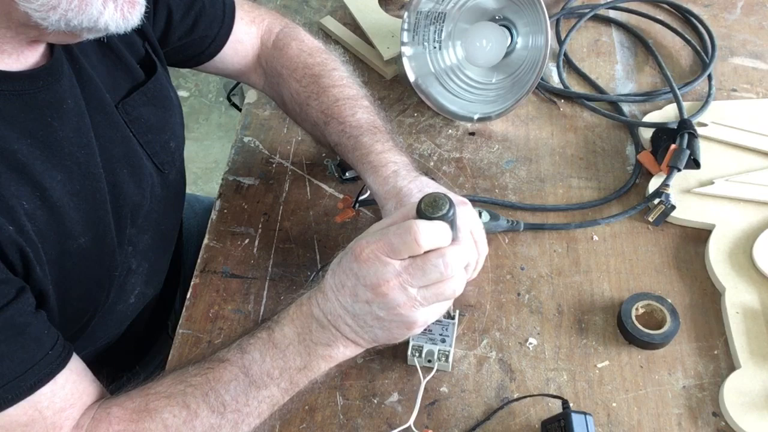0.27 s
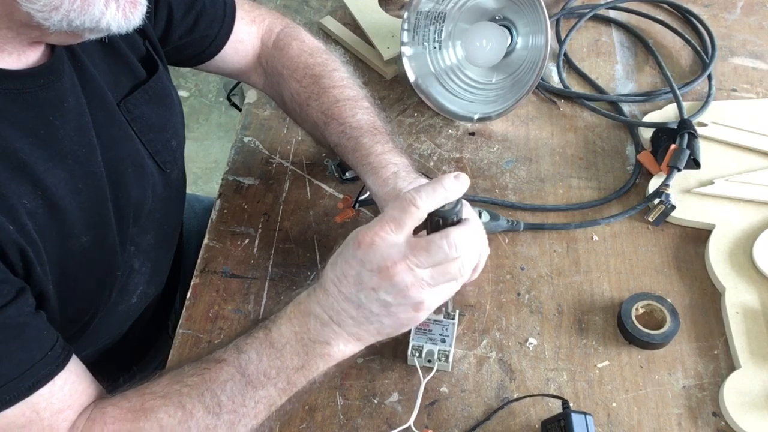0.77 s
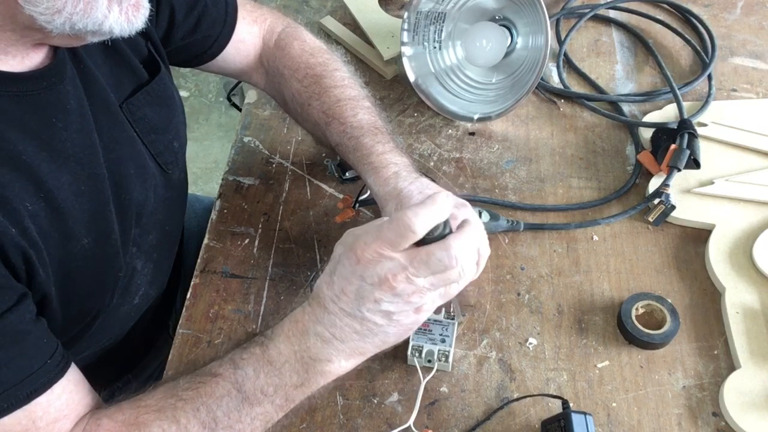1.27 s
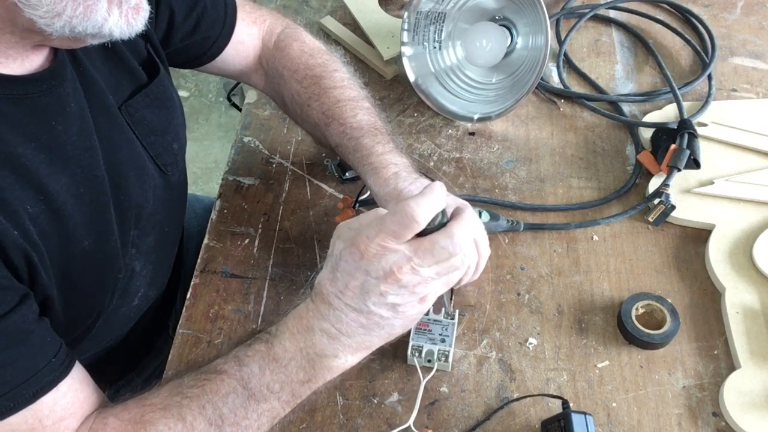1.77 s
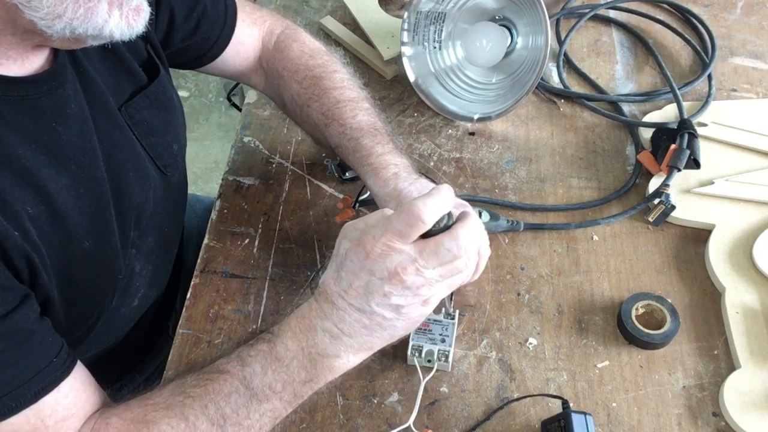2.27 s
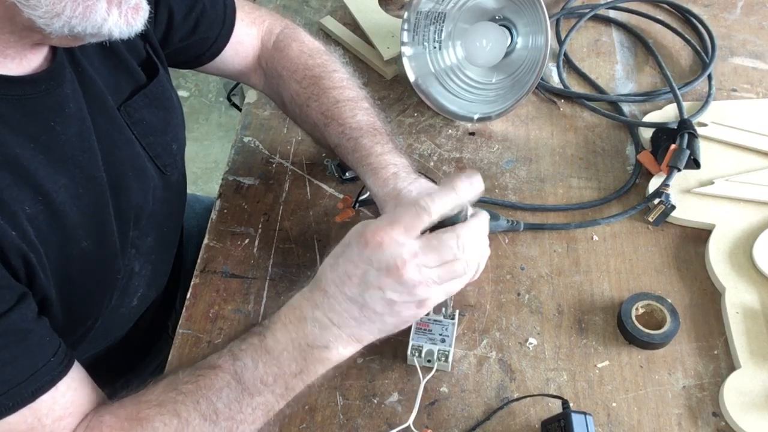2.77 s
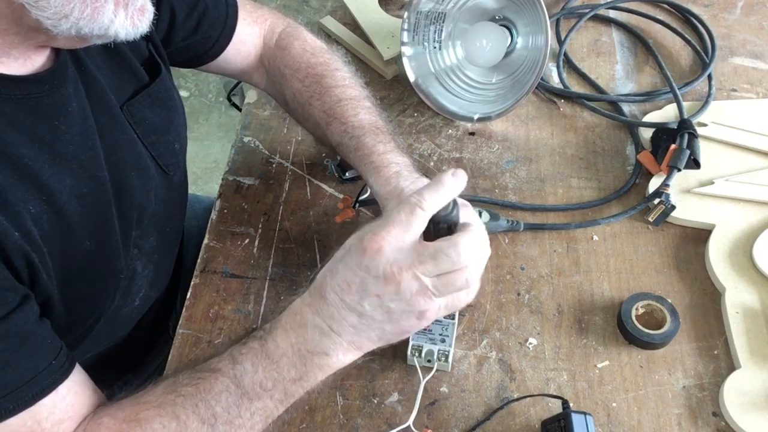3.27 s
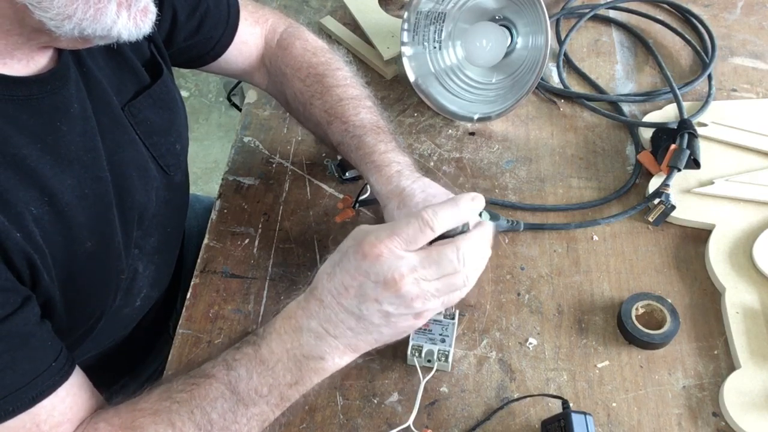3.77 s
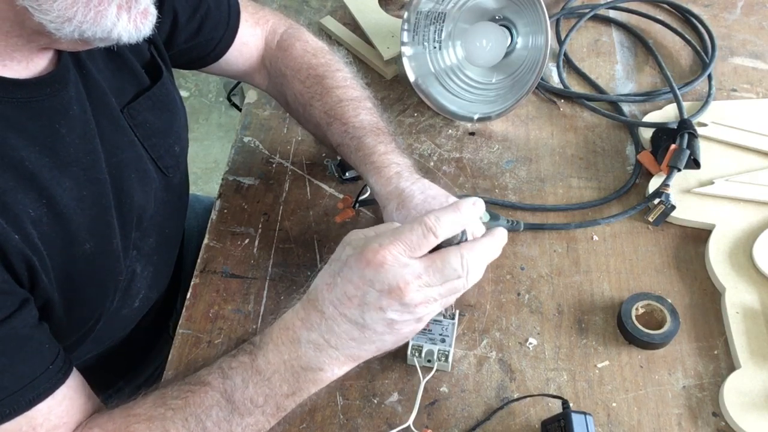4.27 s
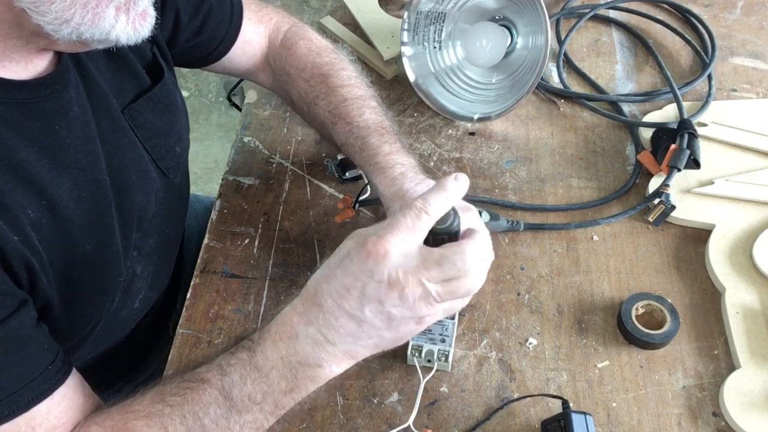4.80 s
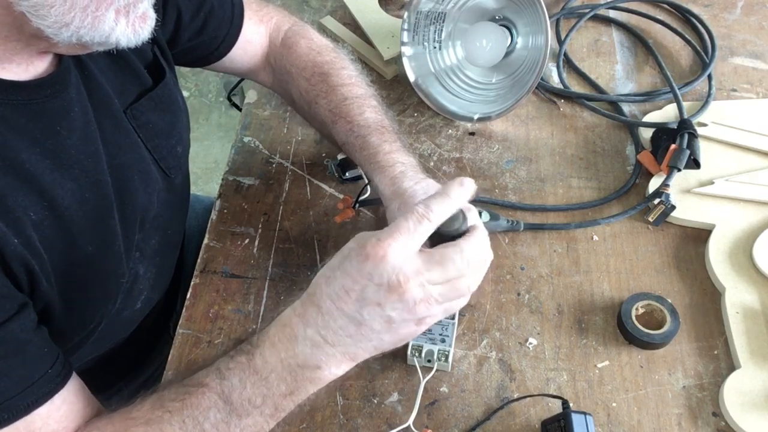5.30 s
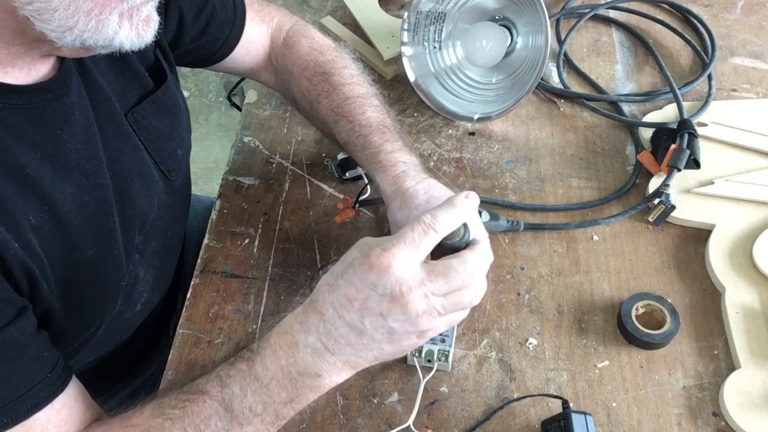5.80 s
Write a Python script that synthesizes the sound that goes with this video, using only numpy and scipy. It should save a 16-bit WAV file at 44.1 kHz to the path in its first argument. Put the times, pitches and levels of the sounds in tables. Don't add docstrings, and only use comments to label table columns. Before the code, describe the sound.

Close, quiet workshop sounds of a blade clicking and slipping in a screw slot, palms rubbing the handle, the wooden bench thudding softly.

```python
import sys
import numpy as np
from scipy import signal
from scipy.io import wavfile

SR = 44100
rng = np.random.default_rng(int(sys.argv[2]) if len(sys.argv) > 2 else 0)


def boost_factor(decibels):
    exponent = np.asarray(decibels, float) / 20
    return 10 ** exponent


def store_wav(level_fs):
    pcm = np.round(np.clip(np.atleast_2d(level_fs), -1, 1) * 32767)
    wavfile.write(sys.argv[1], SR, pcm.T.astype(np.int16))


N = 266584


def rms_one(x):
    return x / np.sqrt(np.mean(x ** 2) + 1e-24)


def at_hz(points, hz):
    table_hz, values = np.transpose(points)
    return np.interp(np.log(hz), np.log(table_hz), values)


def drift(rate):
    r = np.exp(-80 * np.pi * rate / SR)
    white = rng.standard_normal(N // 40 + 2002)
    slow = signal.lfilter([1], [1, -2 * r, r * r], white)[2000:]
    return np.interp(np.arange(N) / 40, np.arange(len(slow)), rms_one(slow))


def ring(force, hz, t60):
    r, w = boost_factor(-60 / (t60 * SR)), 2 * np.pi * hz / SR
    return signal.lfilter([0, np.sin(w)], [1, -2 * r * np.cos(w), r * r], force + 1e-18)


def band_pass(x, order, edges_hz):
    return signal.sosfilt(signal.butter(order, edges_hz, "band", fs=SR, output="sos"), x)


BAND_EDGES_HZ = 18 * 2 ** np.arange(0, 10.1, 1 / 3)


def bands(white):
    for k, (low, high) in enumerate(zip(BAND_EDGES_HZ, BAND_EDGES_HZ[1:])):
        yield np.sqrt(low * high), band_pass(white[k % 2], 2, [low, high])


def grains(per_s, spread_db):
    sizes = boost_factor(spread_db * np.minimum(rng.exponential(1, N), 5)) * rng.choice([-1, 1], N)
    return sizes * (rng.random(N) < per_s / SR)


def add(out, s, piece):
    i = round(s * SR)
    out[i:i + len(piece)] += piece[:N - i]


# frequency in Hz, level in dB per Hz.
AIR_COLOUR = [(12, -52), (20, -27), (36, -6), (63, -4), (296, -22), (580, -22.5), (631, -23), (812, -23),
              (1730, -28), (1880, -28), (2360, -31.5), (4500, -33.5), (6120, -33.5), (11700, -34.5),
              (16300, -43)]
AIR_DB = -67.5


def air():
    white = rng.standard_normal((2, N + SR))
    hum = sum(boost_factor(at_hz(AIR_COLOUR, hz) + .6 * drift(7.4)) * x[SR:] for hz, x in bands(white))
    return boost_factor(AIR_DB) * rms_one(hum)


# frequency in Hz, t60 in seconds.
SHOP_T60 = [(100, 0.25), (500, .3), (2000, 0.28), (4000, 0.23), (7000, 0.18), (12000, 0.15)]


def shop(x):
    t = np.arange(SR // 2) / SR
    white = rng.standard_normal((2, len(t)))
    echo = sum(v * boost_factor(-60 * t / at_hz(SHOP_T60, hz)) for hz, v in bands(white))
    echo = echo * (1 - np.exp(-t / 0.0028))
    return signal.fftconvolve(x, echo / np.sqrt(np.sum(echo ** 2)))[:N]


# start in seconds, peak in dB, pitch in Hz.
KNOCKS = [(0.325, -55, 275), (1.353, -38.5, 262), (2.4346, -15.5, 288.6), (5.582, -49.5, 315),
          (2.864, -54, 275), (2.919, -52, 275), (0.385, -50.5, 274), (0.447, -42, 223), (0.497, -54, 240),
          (0.55, -47, 275), (0.609, -48.5, 273), (2.355, -58, 284), (2.665, -54, 218), (2.786, -64, 305),
          (2.826, -45, 335), (2.965, -50.5, 150), (2.992, -46, 320), (3.067, -48.5, 287),
          (3.396, -46.5, 298.5), (3.524, -55, 281), (3.696, -46, 291), (3.897, -55, 303), (4.996, -45, 320),
          (5.025, -39, 320), (5.043, -50, 265), (5.23, -42.5, 288), (5.313, -52, 320), (5.377, -47, 340),
          (5.577, -54, 158), (5.968, -44, 308)]
# start in seconds, peak in dB, pitch in Hz.
ROCKING = [
    (0.959, -38.5, 125),
    (1.001, -51.5, 146),
    (2.447, -41, 63.5),
    (2.521, -43, 57),
    (2.561, -60, 75),
    (5.044, -54, 65),
    (5.378, -46.5, 98),
]


def knocks():
    out, t = np.zeros(N), np.arange(16384) / SR
    for s, peak_db, hz in KNOCKS + ROCKING:
        push = np.sin(np.pi * np.clip(t * hz * 2.5, 0, 1))
        sound = np.gradient(ring(push, hz, 13 / hz))
        add(out, s, boost_factor(peak_db - 4.0) * sound / np.abs(sound).max())
    return out


# start in seconds, length in seconds, then palm rub, screw grind
# and bench rumble in dB.
TWISTS = [(0.314, 0.21, -76, -69, -63.5), (0.505, 0.14, -79, -66.5, -68), (0.616, 0.21, -84.5, -66, -80),
          (2.092, 0.038, -90, -58, -58), (2.47, 0.096, -70, -64, -69.5), (2.597, 0.026, -82, -69, -68),
          (2.657, .16, -64.5, -66, -61), (2.83, 0.086, -73.5, -71, -68), (3.136, 0.03, -78.5, -81, -76),
          (2.998, 0.12, -66.5, -61, -66), (3.316, .12, -63, -61.5, -67), (3.657, 0.1, -68.5, -65.5, -63.5),
          (3.755, 0.27, -73.5, -68.5, -74.5), (4.285, 0.035, -85, -71.5, -62.5),
          (4.884, 0.17, -69, -60.5, -57.5), (5.057, 0.067, -75, -67, -71), (5.122, .12, -88, -67.5, -85),
          (5.248, 0.21, -65.5, -64, -62.5), (5.467, 0.17, -78.5, -70, -70.5),
          (5.664, 0.19, -79, -72.5, -74.5), (5.82, 0.091, -74.5, -61.5, -73), (5.929, .12, -72.5, -66, -63)]
# levels of palm, screw and bench in dB.
RESTING_DB = [-92.5, -88, -78.5]
GRIP_S, LET_GO_S, SAG_DB_PER_S = 0.049, 0.0207, 20
UNEVEN_DB = 1.5


def effort():
    t, gains = np.arange(N) / SR, boost_factor(np.array(RESTING_DB))[:, None]
    for s, length_s, *levels_db in TWISTS:
        grip = np.sin(np.pi / 2 * np.clip((t - s) / GRIP_S, 0, 1)) ** 2
        held = boost_factor(-SAG_DB_PER_S * np.clip(t - s, 0, length_s))
        let_go = np.exp(-np.maximum(t - s - length_s, 0) / LET_GO_S)
        gains = gains + boost_factor(np.array(levels_db))[:, None] * grip * held * let_go
    return gains * boost_factor(UNEVEN_DB * drift(7.6))


# frequency in Hz, level in dB, t60 in seconds.
PRESSED_BENCH = [(162, -5.5, 0.038), (228, -6, .05), (267.6, -4, 0.082), (320, 0.5, 0.053),
                 (568.5, -11, 0.065)]


def bench_rumble():
    lumps = grains(900, spread_db=2.5) * boost_factor(2.5 * drift(20))
    return rms_one(sum(rms_one(ring(lumps, hz, t60)) * boost_factor(db) for hz, db, t60 in PRESSED_BENCH))


# frequency in Hz, level in dB per Hz.
PALM_COLOUR = [(1180, -32), (2000, -2), (2400, -11), (2910, 1), (3280, -13), (4450, -27), (4900, -11.5),
               (7060, -9.5), (12900, -12), (16000, -22)]


def palm_rub():
    skin = [grains(16000, spread_db=1.0) for k in range(2)]
    return rms_one(sum(boost_factor(at_hz(PALM_COLOUR, hz) + 1.8 * drift(25)) * x
                       for hz, x in bands(skin) if hz > 3500))


# frequency in Hz, width in Hz, level in dB.
GRIND_MODES = [(600, 90, -6), (964, 70, -2), (1150, 60, -6), (1390, 90, -6), (1900, 80, 1), (3000, 70, -1),
               (4200, 400, -8)]


def screw_grind(palm_db):
    grit = grains(6000, spread_db=2.5) * boost_factor(2.5 * drift(30))
    tuned = sum(boost_factor(db + 4 * drift(6)) * rms_one(ring(grit, hz, 2.2 / width_hz))
                for hz, width_hz, db in GRIND_MODES)
    broad = band_pass(grit, 2, [500, 4500])
    seated = boost_factor(np.clip(palm_db + 70, -12, 1))
    return seated * rms_one(tuned) + rms_one(broad)


def turning():
    palm_db, grind_db, rumble_db = 20 * np.log10(effort())
    palm = boost_factor(palm_db) * palm_rub()
    grind = boost_factor(grind_db - 5.5) * screw_grind(palm_db)
    return palm + grind + boost_factor(rumble_db) * bench_rumble()


# start in seconds, peaks of case, terminal and bench in dB,
# case pitch in Hz.
TAPS = [(0.3401, -58.5, -54, -54, 545), (0.4778, -45.5, -44, -45.5, 1370), (1.279, -50.5, -44, -55.5, 1730),
        (2.121, -57, -54, -54, 1270), (2.4942, -47, -63, -67, 1390), (4.251, -59, -70, -78.5, 1700),
        (4.064, -56, -65.5, -66, 1490), (4.484, -62, -74, -68, 970), (2.41, -59, -70, -60.5, 1410),
        (4.8734, -50, -51.5, -53.5, 592), (4.9297, -53, -70, -56, 1950), (5.1122, -54, -55, -51, 940),
        (5.246, -59.5, -62, -75, 970), (5.48, -44, -56, -69, 1120), (5.8334, -42, -48.5, -62, 600)]


def taps():
    length_s, metal_hz = 0.0053, 3000
    return [(s, metal_db, case_db, metal_db - 13, length_s, bench_db, case_hz, metal_hz)
            for s, case_db, metal_db, bench_db, case_hz in TAPS]


# start in seconds, terminal peak in dB, shaft peak in dB,
# metal pitch in Hz, chatter length in seconds.
TICKS = [(0.32, -65, -64, 5800, .004), (0.809, -68, -66, 4150, .004), (0.815, -51, -58, 7050, .0069),
         (4.309, -56, -64, 4550, 0.0038), (0.837, -57, -61, 4010, .0045), (1.973, -46.5, -66, 4300, 0.0085),
         (2.856, -74, -65, 7060, .0053), (3.0414, -51.5, -53.5, 2900, 0.0071),
         (3.2175, -47.5, -51, 5530, 0.0043), (3.315, -50, -68.5, 3500, 0.0029),
         (3.697, -59, -70.5, 2820, .003), (4.0732, -44, -48, 3000, 0.0049),
         (4.318, -57, -62.5, 7020, .0075), (4.4816, -66, -61, 7260, 0.0033),
         (4.7235, -55, -68, 2670, 0.0037), (5.936, -54, -58, 11300, 0.0027),
         (5.556, -76.5, -63, 11400, 0.0053)]


def ticks():
    case_below_db, bench_below_db, case_hz = -13, -17, 1420
    return [(s, db, db + case_below_db, shaft_db, length_s, db + bench_below_db, case_hz, metal_hz)
            for s, db, shaft_db, metal_hz, length_s in TICKS]


# start in seconds, peaks of terminal, case and shaft in dB, chatter length in
# seconds.
SLIPS = [(0.929, -25.5, -38.5, -30.5, 0.0083), (0.95, -26, -37.5, -27, 0.0027),
         (0.996, -44, -60, -50, 0.0076), (1.3483, -32, -42, -41.5, 0.0032),
         (1.3631, -37.5, -74, -44, 0.0042), (2.0868, -44.5, -60, -49, 0.0044), (2.1, -45, -61, -46, 0.0022),
         (2.143, -56, -72, -71, 0.0032), (2.4250, -35.5, -50.5, -40, 0.01), (2.4327, -27, -75, -21, 0.0027),
         (2.4335, -19, -16, -27, 0.0046), (5.487, -55, -54, -58, 0.022), (5.842, -49, -49.5, -55, 0.024)]
# bench peak in dB, case pitch in Hz, metal pitch in Hz.
SLIP_LANDINGS = [(-47, 2400, 3800), (-45.5, 690, 6100), (-82, 700, 9600), (-50.5, 1500, 4150),
                 (-49, 1400, 6800), (-58.5, 1300, 3600), (-57, 1100, 5900), (-64, 1100, 4500),
                 (-39, 1480, 4500), (-45.5, 1800, 12900), (-23.5, 1636, 6300), (-72, 1100, 2400),
                 (-68, 1530, 3700)]


def slips():
    return [slip + landing for slip, landing in zip(SLIPS, SLIP_LANDINGS)]


FOCUS_DB = 10.5


def struck(body, force, scatter, focus_hz, crack_db):
    hz, level_db, t60 = np.transpose(body)
    near = np.exp(-(np.log(hz / focus_hz) / .2) ** 2)
    shares = boost_factor(level_db + FOCUS_DB * near + 1.5 * scatter[:len(hz)])
    shares = shares * (-1) ** np.arange(len(hz))
    rings = [ring(force, f, d) for f, d in zip(hz, t60)]
    modes = sum(g * v / np.abs(v).max() for g, v in zip(shares, rings))
    signs = rng.choice([-1, 1], len(force))
    crack = band_pass(force * signs, 3, [.85 * hz[0], min(1.15 * hz[-1], 15300)])
    crack = crack + 2 * signal.lfilter(*signal.iirpeak(focus_hz, 3, SR), crack)
    sound = modes / np.abs(modes).max() + boost_factor(crack_db) * crack / np.abs(crack).max()
    return sound / np.abs(signal.hilbert(sound)).max()


# frequency in Hz, level in dB, t60 in seconds.
BENCH = [(113.3, -9.5, 0.32), (145.4, -6.5, 0.17), (197.8, -1, 0.079), (258, -3, 0.071), (292, -1.5, 0.036),
         (404, -3.5, 0.053), (544, 4.5, 0.012)]
CASE = [(520, -5, .03), (600, -5, .03), (717, -4, .03), (830, -7, .025), (964, -3, .035), (1150, -2, .03),
        (1290, -1, .03), (1467, -2, .025), (1640, -1, .025), (1780, -3, .025), (1915, 0, .035),
        (2250, -5, .02)]
TERMINAL = [(2700, -5, .015), (2960, -1, .022), (3350, -4, .01), (3750, -3, .01), (4150, -2, .01),
            (4550, -1, .012)]
SHAFT = [(5700, -2, .006), (6300, -3, .005), (7050, -1, .006), (7800, -3, .005), (8500, -2, .005),
         (9500, -4, .004), (11300, -7, .003), (12800, -5, .003), (14500, -10, .002)]


def blade_clicks():
    out, t = np.zeros(N), np.arange(8192) / SR
    contacts = slips() + taps() + ticks()
    chance = rng.standard_normal((len(contacts), 8192 + 48))
    push = np.sin(np.pi * np.clip(t / 0.0015, 0, 1))
    settling = boost_factor(-25.5) * np.exp(-t / 0.024)
    for row, draw in zip(contacts, chance):
        s, terminal_db, case_db, shaft_db, length_s, bench_db, case_hz, metal_hz = row
        contact = (1 - np.exp(-t / 0.00005)) * np.exp(-(t / max(length_s, 2e-4)) ** 2)
        scatter, noise = draw[:48].reshape(4, 12), draw[48:]
        chatter = (noise * (contact * np.abs(noise) + settling))[:4096]
        terminal = struck(TERMINAL, chatter, scatter[0], metal_hz, crack_db=-2.0)
        bench = struck(BENCH, push, scatter[1], focus_hz=275, crack_db=-26.0)
        case = struck(CASE, chatter, scatter[2], case_hz, crack_db=-5.5)
        shaft = struck(SHAFT, chatter, scatter[3], metal_hz, crack_db=-1.0)
        s = s + .0012
        add(out, s, boost_factor(terminal_db - 1.5) * terminal)
        add(out, s + 0.0018, boost_factor(bench_db + 3.5) * bench)
        add(out, s + 0.00066, boost_factor(case_db + 2.5) * case)
        add(out, s, boost_factor(shaft_db + 6.0) * shaft)
    return out


SHOP_DB = -12


def scene():
    bench = blade_clicks() + knocks() + turning()
    return (bench + boost_factor(SHOP_DB) * shop(bench) + air())[None]


def top_cut(x):
    return signal.sosfilt(signal.butter(12, 16490, fs=SR, output="sos"), x)


# frequency in Hz, width in Hz, level in dB.
MIC_DIPS = [(4923, 690, -4), (10640, 340, -6)]


def record(dry):
    for hz, width_hz, db in MIC_DIPS:
        dry = dry - (1 - boost_factor(db)) * signal.lfilter(*signal.iirpeak(hz, hz / width_hz, SR), dry)
    dry = signal.sosfilt(signal.butter(2, 33, "high", fs=SR, output="sos"), dry)
    mix = signal.sosfilt(signal.cheby2(12, 60, 16700, fs=SR, output="sos"), dry)
    return top_cut(mix)


dry = scene()
out = record(dry)
store_wav(out)
```